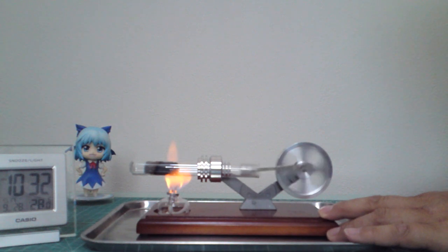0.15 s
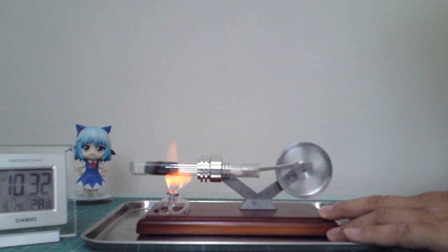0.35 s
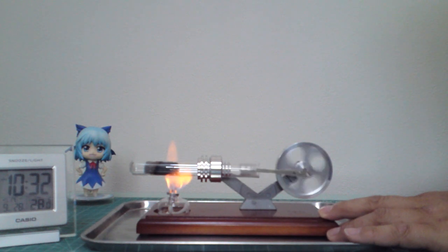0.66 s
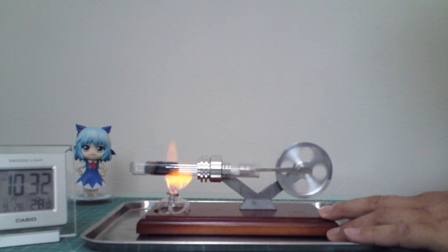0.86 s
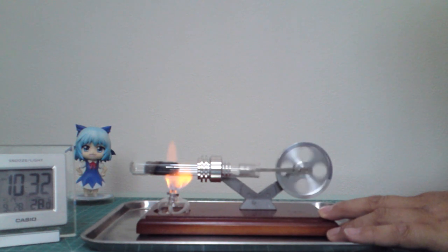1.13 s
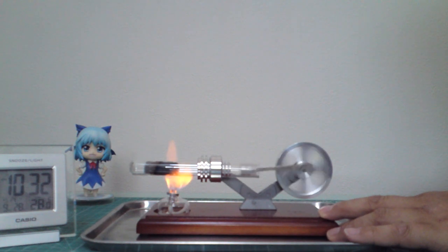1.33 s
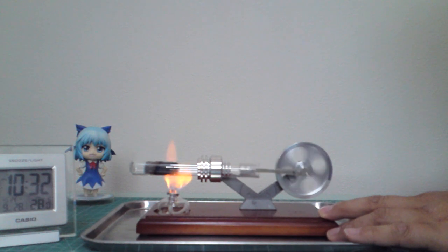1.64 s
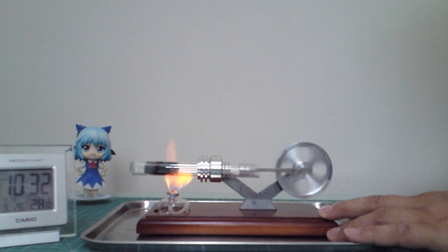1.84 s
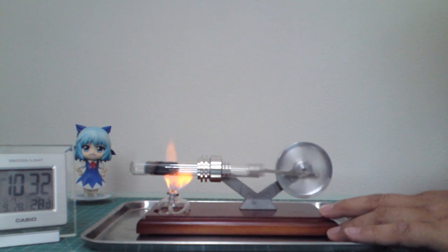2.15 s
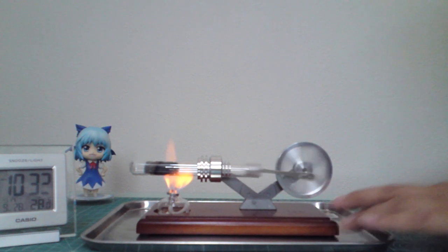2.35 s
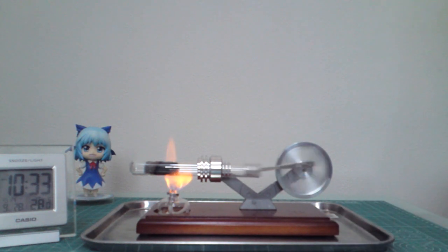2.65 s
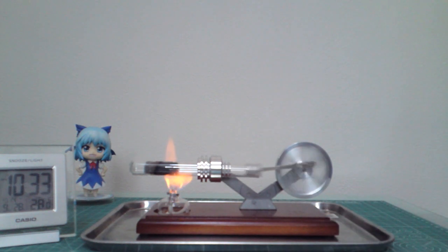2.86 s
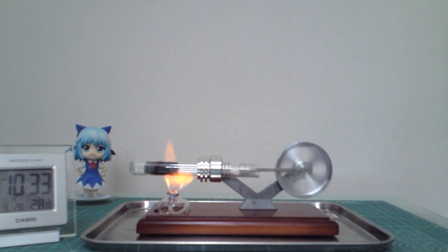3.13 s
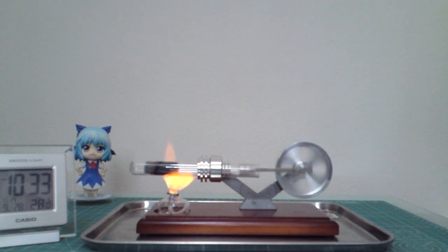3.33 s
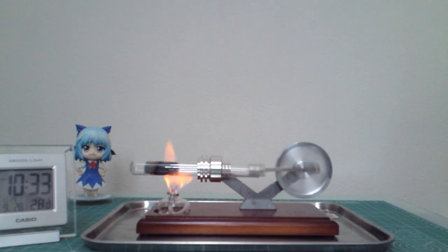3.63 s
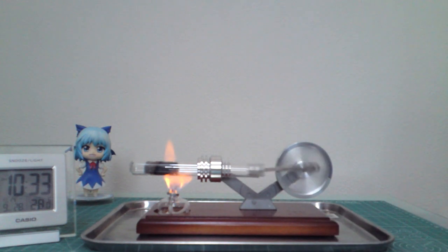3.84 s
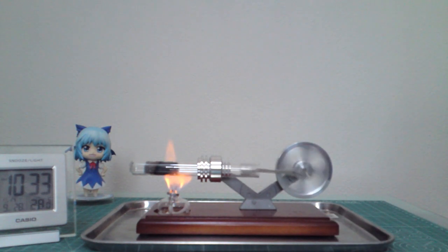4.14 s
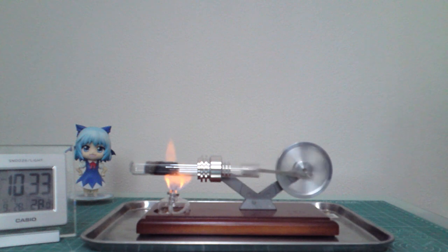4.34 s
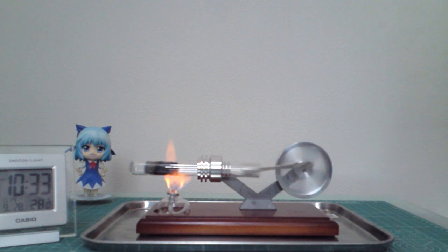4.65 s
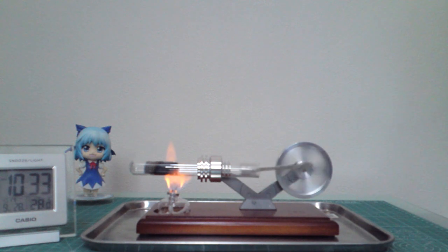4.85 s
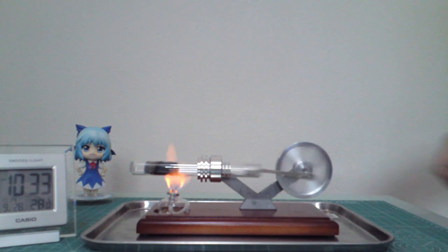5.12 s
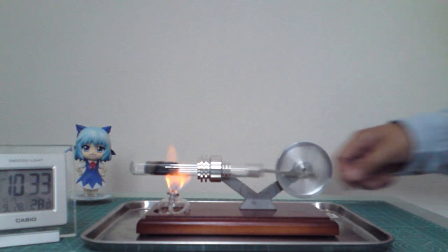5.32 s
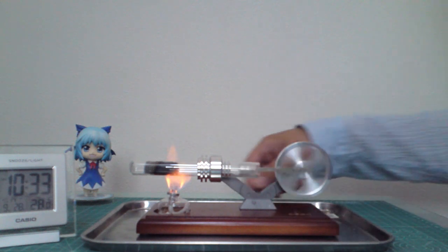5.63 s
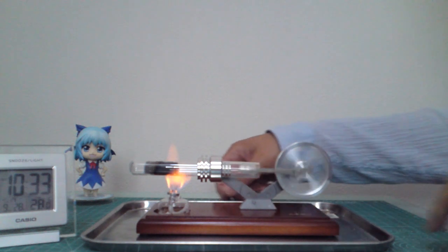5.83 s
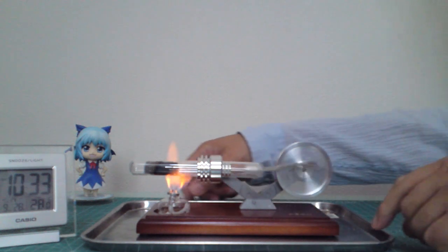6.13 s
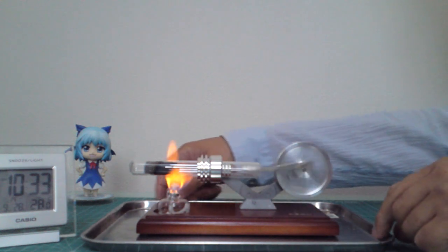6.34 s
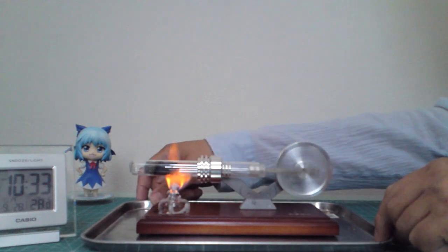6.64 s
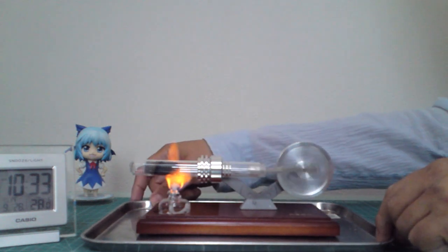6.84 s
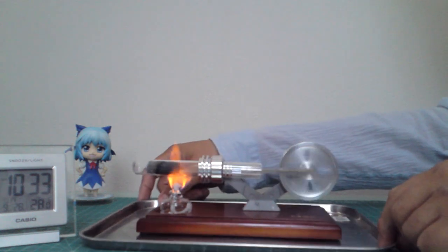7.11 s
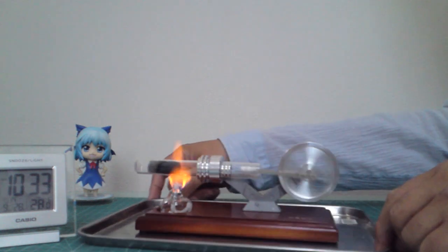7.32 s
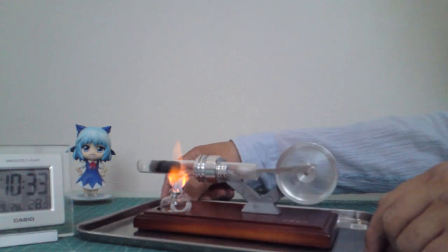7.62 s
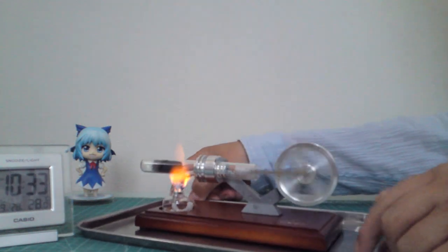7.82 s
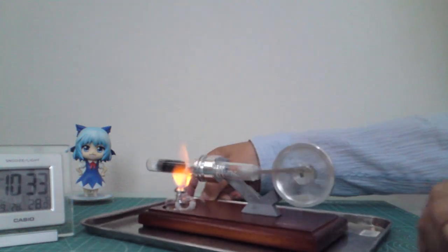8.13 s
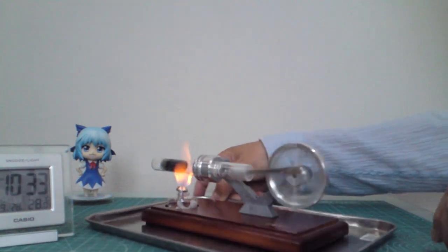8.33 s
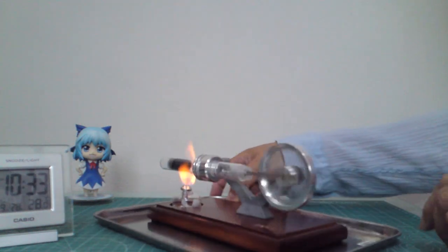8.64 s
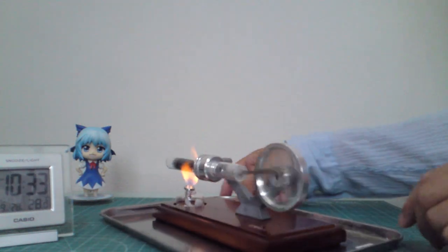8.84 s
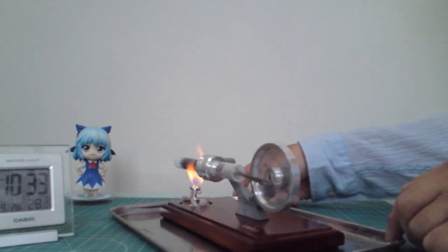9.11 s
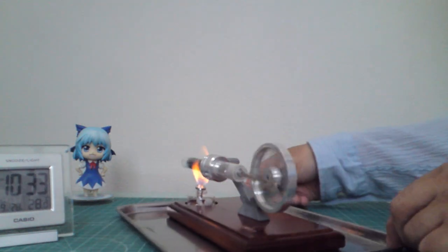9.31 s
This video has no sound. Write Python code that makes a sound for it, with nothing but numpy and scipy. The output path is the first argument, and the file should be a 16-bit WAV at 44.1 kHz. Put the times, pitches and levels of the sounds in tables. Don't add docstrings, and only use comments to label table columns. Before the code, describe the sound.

Close, almost central pickup of a little flywheel engine on a wooden base and steel tray. Lopsided pairs of tinny clacks start slowly, gather pace and settle into fast rattling, with soft low table thumps beneath. A faint distant appliance whine sinks in pitch and stops. Woody creaks cluster as a hand leans in, with muffled sliding as the tray turns, over low rumble and light hiss.

```python
import sys
import numpy as np
from scipy import signal
from scipy.fft import rfft, irfft, next_fast_len
from scipy.io import wavfile
from scipy.ndimage import uniform_filter1d

SR = 44100
rng = np.random.default_rng(int(sys.argv[2]) if len(sys.argv) > 2 else 0)


def magnitude_from_level(level_db):
    exponent = np.asarray(level_db, float) / 20
    return 10 ** exponent


def output_pcm(signal):
    pcm = np.clip(np.atleast_2d(signal).T, -1, 1) * 32767
    wavfile.write(sys.argv[1], SR, np.round(pcm).astype(np.int16))


N = 417627

TURNING = (4.86, 7.8)
# time in seconds, speed in turns per second,
# how far the return knock comes ahead of the power knock in ms.
FLYWHEEL = [(0, 3.307, 35), (.45, 2.57, 39), (.75, 3.577, 41.5), (1, 3.857, 44), (1.5, 4.312, 46),
            (2.2, 4.533, 48), (3, 4.892, 48), (3.6, 5.053, 49.5), (4.2, 5.175, 50.5), (5.5, 5.33, 52.5),
            (7, 5.475, 54.5), (8, 5.605, 56), (9.5, 5.734, 56)]


def in_time(rows):
    s, *columns = np.transpose(rows)
    return [np.interp(np.arange(N) / SR, s, column) for column in columns]


def coloured(x, points):
    size = next_fast_len(N)
    hz = np.maximum(np.arange(size // 2 + 1) * SR / size, 1)
    point_hz, point_db = np.transpose(points)
    gain = magnitude_from_level(np.interp(np.log(hz), np.log(point_hz), point_db))
    return irfft(rfft(x, size) * gain, size)[..., :N]


def ring(x, hz, t60):
    r, w = magnitude_from_level(-60 / (t60 * SR)), 2 * np.pi * hz / SR
    feedback = [1, -2 * r * np.cos(w), r * r]
    mount = signal.lfilter([0, np.sin(w)], feedback, x + 1e-18)
    return signal.lfilter([0, 2 * np.e * (1 - r) * np.sin(w)], feedback, mount)


def clicks_at(seconds, sizes):
    out = np.zeros(N + SR)
    np.add.at(out, (np.asarray(seconds) * SR).astype(int), sizes)
    return out[:N]


def room_noise():
    # pitch in Hz, level in dB per Hz.
    colour = [(12, -47), (20, 5.5), (35, -4.5), (60, -5.5), (187, -13.5), (537, -17), (809, -21.5),
              (920, -20.5), (1130, -24.5), (1220, -18.5), (1320, -24.5), (3500, -29), (6160, -30.5),
              (7010, -31), (9300, -34.5), (12100, -77.5), (20500, -120)]
    # time in seconds, level in dB.
    loudness = [(0, -50.5), (3, -49.5), (6, -48), (9.5, -47.5)]
    noise = coloured(rng.standard_normal((2, N)), colour)
    return noise * magnitude_from_level(in_time(loudness)[0]) / np.std(noise)


def whine():
    # time in seconds, pitch in Hz, level in dB.
    steps = [
        (0, 1207, -64),
        (1.3, 1204, -65),
        (2.7, 1195, -70),
        (3.5, 1188, -65),
        (3.7, 1176, -65),
        (4.2, 1194, -65),
        (4.3, 1165, -69),
        (5.1, 1158, -65),
        (6.25, 1156, -65),
    ]
    hz, level_db = in_time(steps)
    waver_hz = uniform_filter1d(rng.standard_normal(N), size=4000) * 220
    on = np.clip((steps[-1][0] - np.arange(N) / SR) / .3, 0, 1)
    return np.sqrt(2) * magnitude_from_level(level_db) * on * np.sin(2 * np.pi * np.cumsum(hz + waver_hz) / SR)


def drag():
    # time in seconds, level in dB.
    strength = [
        (0, -80.5),
        (4.8, -63),
        (5.6, -57.5),
        (6.6, -57.5),
        (7, -57),
        (7.5, -62),
        (8.2, -65.5),
        (8.8, -57.5),
        (9.5, -72),
    ]
    # pitch in Hz, level in dB per Hz.
    colour = [(100, -28), (170, 5), (300, -17.5), (500, -6.5), (800, -8), (1500, -33)]
    noise = coloured(rng.standard_normal(N), colour)
    return magnitude_from_level(in_time(strength)[0]) * noise / np.std(noise)


def creaks():
    # time in seconds, peak in dB, pitch in Hz.
    lone = [(2.565, -33, 328), (4.787, -36.5, 338), (5.097, -32.5, 277), (5.127, -40, 370),
            (5.297, -33, 320), (5.317, -42, 229), (5.423, -42, 332), (5.449, -41, 327), (7.409, -33.5, 188),
            (8.518, -39.5, 332), (8.812, -38, 339), (9.237, -36, 345), (9.449, -34.5, 346)]
    # time in seconds, peak in dB.
    leaning = [(5.668, -38), (5.73, -43), (5.774, -35.5), (5.803, -35.5), (5.838, -34), (5.915, -32),
               (5.957, -34.5), (6.015, -34), (6.029, -37), (6.056, -36), (6.069, -37), (6.099, -37.5),
               (6.126, -35), (6.139, -33), (6.197, -32), (6.239, -35.5), (6.284, -34.5), (6.313, -35),
               (6.399, -33.5), (6.429, -34.5), (6.453, -35), (6.524, -32.5), (6.559, -39), (6.603, -33.5),
               (6.627, -37)]
    slips = [(s, db, 341 * (1 + 0.02 * rng.standard_normal())) for s, db in leaning]
    out, t = np.zeros(N + SR), np.arange(int(.04 * SR)) / SR
    for s, peak_db, hz in lone + slips:
        swell = (t * hz / 1.214) ** 2 * np.exp(2 - 2 * t * hz / 1.12)
        snap = (t * hz / 0.91) * np.exp(1 - t * hz / 0.71)
        overtone = magnitude_from_level(-10.5 + 3.7 * rng.standard_normal()) * snap * np.sin(3.7 * np.pi * hz * t)
        push = swell * np.sin(2 * np.pi * hz * t) + overtone
        for lag_s, share in ((0, 0.71), (.012, 0.13)):
            i = int((s + lag_s) * SR)
            out[i:i + len(t)] += magnitude_from_level(peak_db + 6.5) * share * push
    return out[:N]


def tap():
    t = np.arange(N) / SR - 1.3352
    return -magnitude_from_level(-29) * np.exp(-(t / .0004) ** 2)


def knock_times():
    speed, lead_ms = in_time(FLYWHEEL)
    turns, t = -.294 + np.cumsum(speed) / SR, np.arange(N) / SR
    power = np.interp(np.arange(int(turns[-1]) + 1), turns, t)
    back = power - np.interp(power, t, lead_ms) / 1000
    return np.ravel([back, power], order="F")


def thumps():
    knocks = knock_times()
    chance = rng.standard_normal((len(knocks), 3))
    s = knocks + 0.017 + .003 * chance[:, 0]
    steadied_db = np.interp(s, [6.36, 7.0], [0, -14.5])
    level_db = -43 - 4.0 * np.exp(-s / .6) + steadied_db + np.resize([-7.0, 0], len(s))
    upper = clicks_at(s, magnitude_from_level(level_db + 1.5 * chance[:, 1]))
    lower = clicks_at(s, magnitude_from_level(level_db + 1.5 * chance[:, 2]))
    return ring(upper, 106.2, 0.097) + 0.55 * ring(lower, 85.0, .08)


def room(x):
    t = np.arange(int(.4 * SR)) / SR
    dying = magnitude_from_level(-60 * t / 0.18) * np.clip(t / 0.0019, 0, 1)
    tails = rng.standard_normal((2, len(t))) * dying
    tails /= np.sqrt(np.sum(tails ** 2, axis=1, keepdims=True))
    return signal.fftconvolve(x[None], tails, axes=1)[:, :N]


def knock_levels(s):
    # dB when slow, dB gained at full speed,
    # dB gained once the tray is turned, random scatter in dB.
    return_knock = [(-41.5, 15, -6, 4), (-47, 9.5, 0.5, 2), (-42.5, 15, 3, 0), (-50.5, 5, -3.5, -1.5),
                    (-31, 2.5, 3.5, 1.5)]
    power_knock = [(-42.5, 12.8, 5.5, 3.7), (-48.5, 15.5, 7, 6.8), (-29.5, 7, 1, 0.88),
                   (-59.5, 27.9, -1, 2.5), (-32, 6.96, 3.5, 0.65)]
    # time in seconds,
    # pin, rod and tray levels in dB.
    askew = [(.4, -29.5, -36, -29), (.44, -30.5, -45, -27), (.76, -42, -51, -28.5), (1.03, -55, -43, -29),
             (1.28, -32, -32, -40), (1.52, -33, -48, -29.5), (1.97, -33, -30.5, -29), (2.63, -29, -57, -17),
             (3.25, -29, -30, -19), (3.65, -31, -31.5, -31), (3.84, -25, -31, -28.5), (4.04, -27, -29, -19),
             (4.81, -27, -59, -19.5), (5.56, -20.5, -44, -18.5), (5.75, -21, -42, -19.5),
             (6.31, -24.5, -25.5, -26), (6.86, -19.5, -54, -18.5), (6.99, -38, -53, -23),
             (7.04, -33, -61, -18), (7.22, -49, -52, -17.5), (7.41, -26.5, -25, -22.5),
             (7.59, -20, -31, -19), (7.71, -24.5, -30, -28), (7.89, -40, -38, -23.5),
             (8.24, -21.5, -61, -35), (8.3, -43, -52, -33), (8.48, -21.5, -27.5, -15),
             (8.77, -37, -31.5, -40), (8.83, -17.5, -23.5, -18), (9.36, -22, -24, -21.5),
             (.09, -51, -60, -28), (2.2, -34, -35, -21.5), (3.04, -29, -30, -24), (3.2, -30.5, -35, -24.5),
             (5, -26.5, -35, -18.5), (5.13, -27.5, -34, -31), (5.32, -38, -36, -43), (5.37, -31, -31, -24),
             (5.88, -29, -36, -33), (7.17, -24.5, -42, -24), (7.77, -25.5, -29.5, -20),
             (7.95, -18.5, -28, -21), (8.12, -19, -32, -19), (8.95, -29.5, -32, -50),
             (9.01, -24.5, -25.5, -24), (9.18, -26, -28.5, -25)]
    law = np.resize([return_knock, power_knock], (len(s), *np.shape(power_knock)))
    slow, full = 2.6, 5.7
    fast = (np.interp(s, *np.transpose(FLYWHEEL)[:2]) - slow) / (full - slow)
    causes = np.stack([np.ones(len(s)), fast, np.interp(s, TURNING, [0, 1])], axis=1)
    level_db = np.einsum("kpc,kc->kp", law[..., :3], causes)
    level_db = level_db + law[..., 3] * rng.standard_normal(law.shape[:2])
    for when, *parts_db in askew:
        level_db[np.argmin(np.abs(s - when)), :3] = parts_db
    return level_db.T


def crack(level_db):
    t = np.arange(int(.02 * SR)) / SR
    burst = signal.fftconvolve(clicks_at(knock_times(), magnitude_from_level(level_db - 9.5)), magnitude_from_level(-60 * t / 0.0056))[:N]
    high_pass = signal.butter(2, 500, "high", fs=SR, output="sos")
    return signal.sosfilt(high_pass, burst * rng.standard_normal(N))


def rattle(seconds, sizes, t60, lead_ms):
    t = np.arange(-int(.03 * SR), int(.25 * SR)) / SR
    shape = np.where(t < 0, 0.4 * np.exp(t * 1000 / lead_ms), magnitude_from_level(-60 * t / t60))
    shiver = signal.fftconvolve(clicks_at(seconds, sizes), shape)[int(.03 * SR):][:N]
    contacts = rng.choice([-1, 1], N) * (rng.random(N) < .04)
    return shiver * contacts * magnitude_from_level(4.0 * np.minimum(rng.exponential(1, N), 3))


def part(level_db, shiver_db, modes, returns, chatter_ms, shiver_t60):
    s, out = knock_times(), 0
    first, turned = np.resize([1, 0], len(s)), np.interp(np.arange(N) / SR, TURNING, [0, 1])
    lags = rng.random((len(s), 3)) * [0, 1, 1] * chatter_ms / 1000
    shares = rng.choice([-1, 1], lags.shape) * [1, .35, .25]
    spray = rattle(s, magnitude_from_level(shiver_db), shiver_t60, lead_ms=5.2)
    for k, (hz, mode_db, t60, first_db, turned_db) in enumerate(modes):
        clicks = spray
        struck_db = 1.3 * rng.standard_normal(len(s))
        lags = lags + rng.uniform(-.0003, .0003, (len(s), 1))
        for delay_ms, return_db in returns:
            chance_db = 1.2 * rng.standard_normal(len(s))
            size = magnitude_from_level(level_db + return_db + first_db * first + struck_db + chance_db)
            times = s[:, None] + lags + delay_ms / 1000
            clicks = clicks + clicks_at(times.ravel(), (size[:, None] * shares).ravel())
        out = out + (-1) ** k * ring(magnitude_from_level(mode_db + turned_db * turned) * clicks, hz, t60)
    return out


def engine():
    # pitch in Hz, level in dB, time to die by 60 dB in seconds,
    # extra dB on the first knock of a turn, extra dB once the tray is turned.
    pin_modes = [(4766, -2.5, 0.0071, -4.5, -2), (5110, -5.5, 0.011, 0, 0), (5422, -9.5, 0.006, 7.5, 1),
                 (5867, -10.5, 0.0077, -12, 4), (6373, -3, 0.0027, -8, 1.5)]
    rim_modes = [(7220, -6.5, 0.0052, 0.98, -1), (7720, -2, 0.0076, 0.71, -0.34),
                 (8280, 1, 0.004, -1, 0.85), (8814, -3, 0.0091, -1.3, 1)]
    rod_modes = [(3835, -3.5, 0.0085, 0.56, -1.4), (4074, 4.5, 0.0083, -0.9, 0.53),
                 (4380, -9, 0.017, -1, 0.89)]
    tray_modes = [(2775, -7.5, 0.014, -1.5, 0.48), (2918, -11.5, 0.014, -2.5, 1),
                  (3076, -2, 0.015, -5.5, -0.6), (3101, -4, 0.0097, 3.5, -0.88), (3560, -18, 0.0097, -1, 0)]
    base_modes = [(503.4, -8, 0.037, -9, -6), (826, 1, 0.0097, 10, -1), (930, -4.5, 0.015, 8, 0.5),
                  (1069, -3, 0.012, 5.5, 2), (1361, -4, 0.014, 9.5, -2.5), (1543, -1.5, 0.0098, -1, 5),
                  (1932, 6.5, 0.007, 8.5, -3), (2297, 1.5, 0.01, 2.5, -3), (2504, -0.5, .022, -2.5, -2)]
    # delay in ms, level in dB.
    pin_returns = [(0, 4), (11.5, -4.5), (21, -5.5), (29.5, -4)]
    rod_returns = [(0, -0.5), (13, -3), (20.5, -5.5), (29.5, -9)]
    tray_returns = [(0, -10.5), (8.5, -16.5), (11.5, 2.5), (21, -15.5), (35, -17)]
    base_returns = [(1.5, -4.5), (4, -7), (10, -9.5)]
    pin_db, rod_db, tray_db, rim_db, shiver_db = knock_levels(knock_times())
    pin = part(pin_db - 8.5, shiver_db - 28.5, pin_modes, pin_returns, chatter_ms=4.6, shiver_t60=0.23)
    rim = part(rim_db - 5, shiver_db - 37, rim_modes, pin_returns, chatter_ms=2.5, shiver_t60=0.28)
    rod = part(rod_db - 6.0, shiver_db - 31.0, rod_modes, rod_returns, chatter_ms=2.206, shiver_t60=0.17)
    tray = part(tray_db - 5.5, shiver_db - 25.5, tray_modes, tray_returns, chatter_ms=1.128, shiver_t60=0.17)
    base = part(shiver_db - 27.5, shiver_db - 35.5, base_modes, base_returns, chatter_ms=3.34, shiver_t60=0.15)
    return pin + rim + rod + tray + base + crack(np.maximum(pin_db, shiver_db - 7.5))


def scene():
    # pitch in Hz, level of the side against the middle in dB.
    width = [(60, -30), (110, -32.5), (190, -26.5), (330, -23.5), (570, -26), (1010, -25.5), (1780, -21),
             (3130, -36), (5510, -32), (9690, -28)]
    knocks = engine()
    tail, side_tail = room(knocks)
    noise = room_noise()
    mid = knocks + magnitude_from_level(-9) * tail + thumps() + creaks() + tap() + whine() + drag() + noise[0]
    side = coloured(magnitude_from_level(8.0) * side_tail + noise[1], width)
    return np.array([mid + side, mid - side])


def patch(x, low, high, share, hold_s):
    band = signal.sosfiltfilt(signal.butter(3, [low, high], "band", fs=SR, output="sos"), x)
    hold = int(hold_s * SR)
    is_open = rng.random(N // hold + 2) < share
    gate = np.repeat(is_open, hold)[rng.integers(hold):][:N]
    return band * uniform_filter1d(gate.astype(float), size=300)


def roll_off(x):
    return signal.sosfilt(signal.butter(12, 10290, fs=SR, output="sos"), x)


def record(dry):
    # low edge in Hz, high edge in Hz, share of the time.
    gaps = [(3330, 3650, .22), (4400, 4750, .15), (6300, 6800, .1), (6800, 7300, .2), (7400, 7800, .05)]
    cut = signal.sosfilt(signal.butter(2, 33.0, "high", fs=SR, output="sos"), dry)
    cut = signal.sosfilt(signal.cheby1(18, 1, 9150, fs=SR, output="sos"), cut)
    mid, side = (cut[0] + cut[1]) / 2, (cut[0] - cut[1]) / 2
    loud = np.clip(uniform_filter1d(np.abs(mid), size=1500) / .004 - .6, 0, 1)
    mid = mid - loud * sum(patch(mid, low, high, share, hold_s=.028) for low, high, share in gaps)
    edges = np.linspace(40, 9300, num=11)
    side = 1.82 * sum(patch(side, low, high, share=.36, hold_s=.05) for low, high in zip(edges, edges[1:]))
    return roll_off(np.array([mid + side, mid - side]))


dry = scene()
out = record(dry)
output_pcm(out)
```